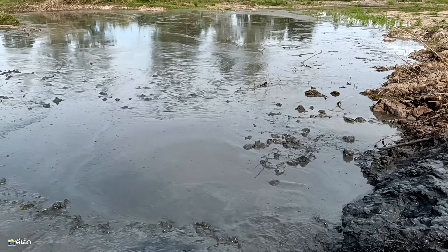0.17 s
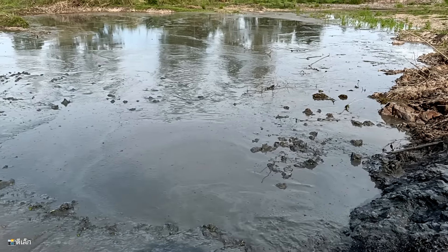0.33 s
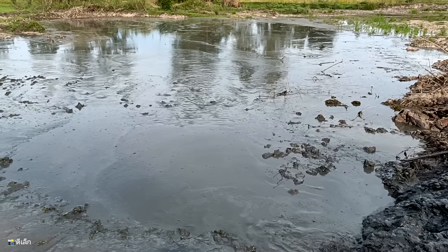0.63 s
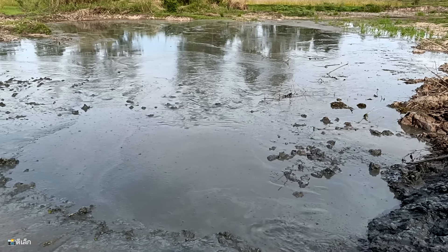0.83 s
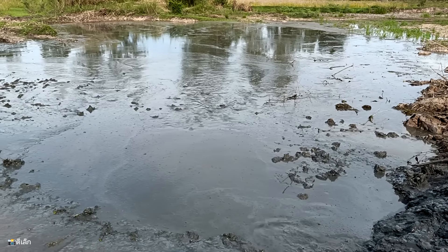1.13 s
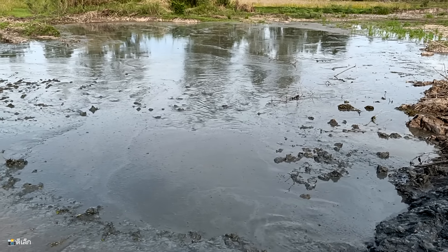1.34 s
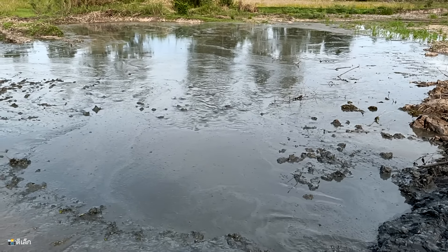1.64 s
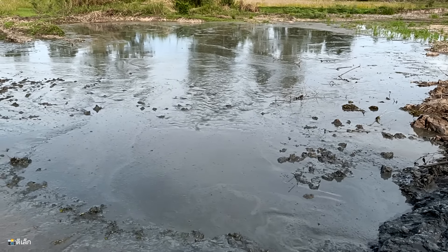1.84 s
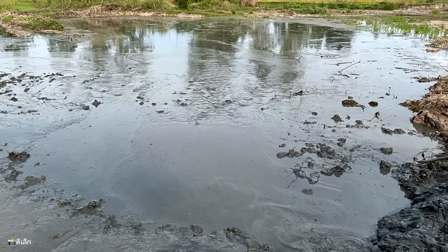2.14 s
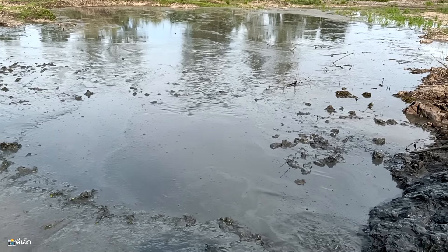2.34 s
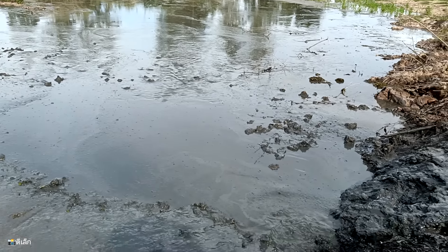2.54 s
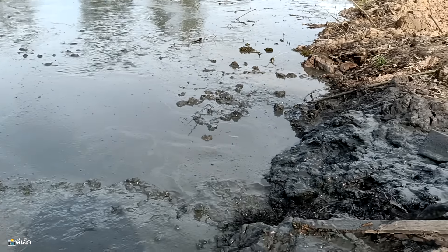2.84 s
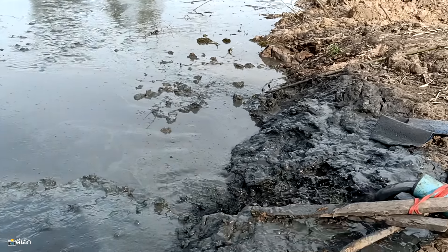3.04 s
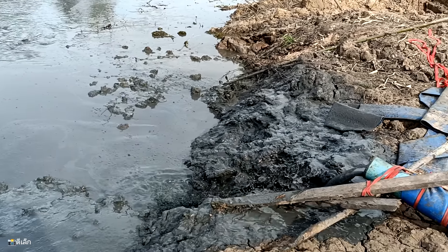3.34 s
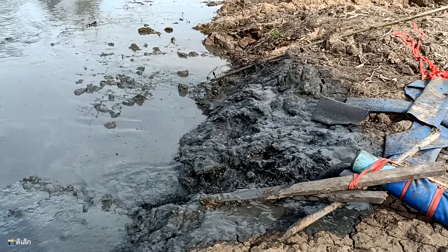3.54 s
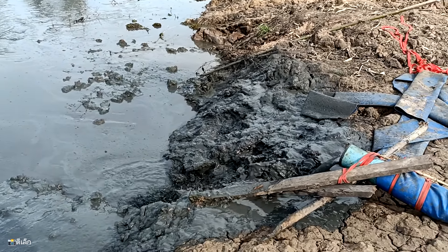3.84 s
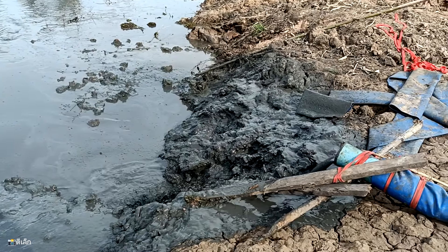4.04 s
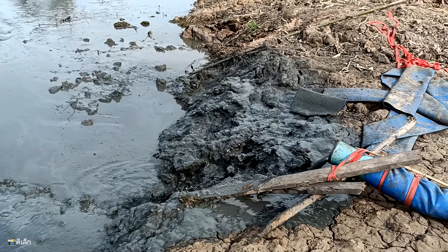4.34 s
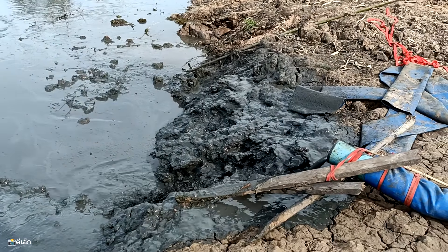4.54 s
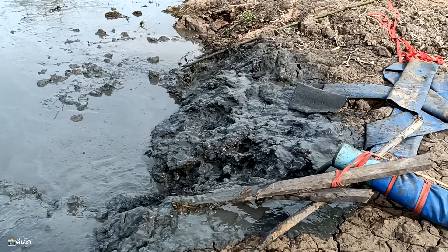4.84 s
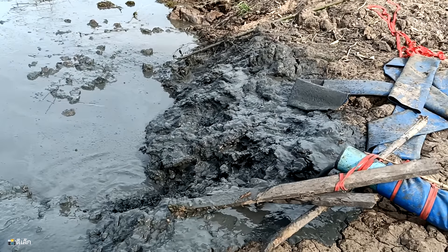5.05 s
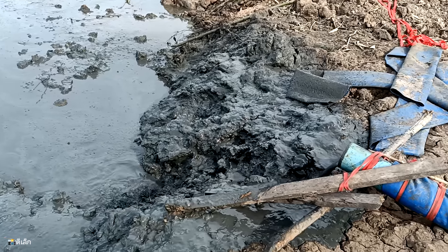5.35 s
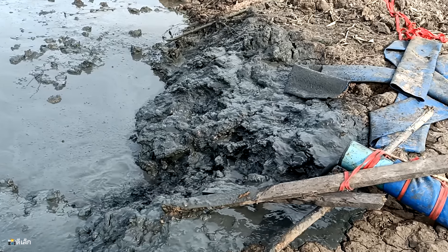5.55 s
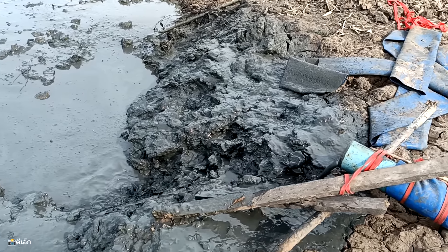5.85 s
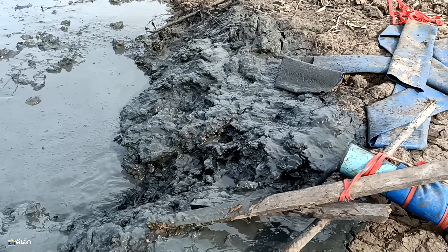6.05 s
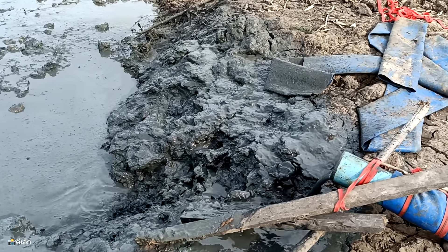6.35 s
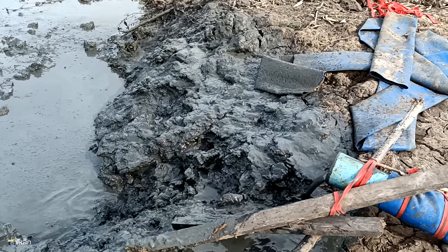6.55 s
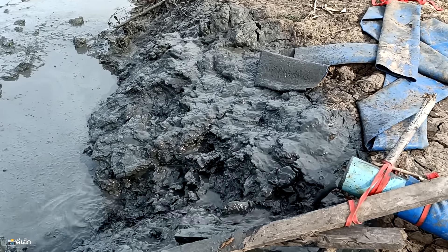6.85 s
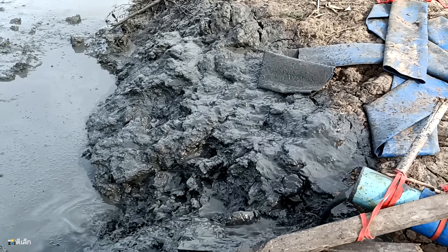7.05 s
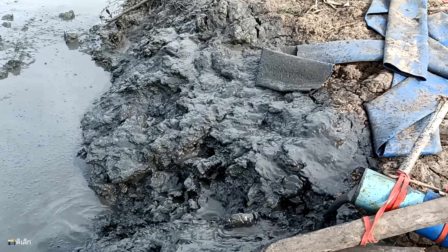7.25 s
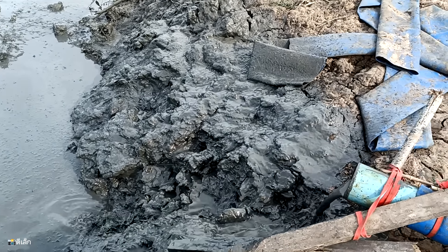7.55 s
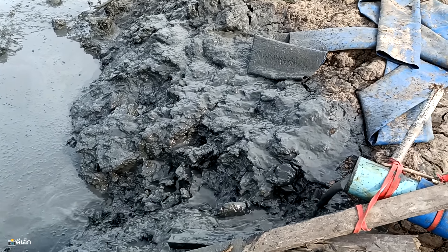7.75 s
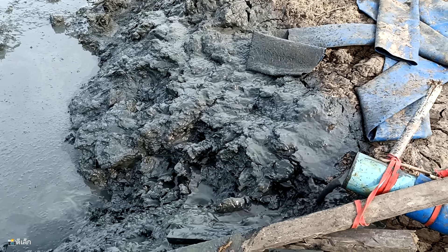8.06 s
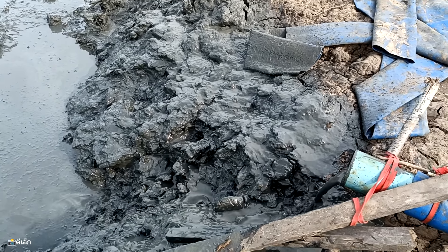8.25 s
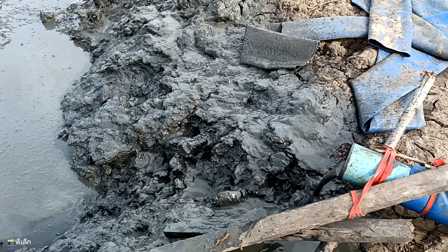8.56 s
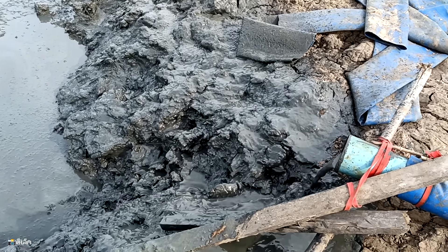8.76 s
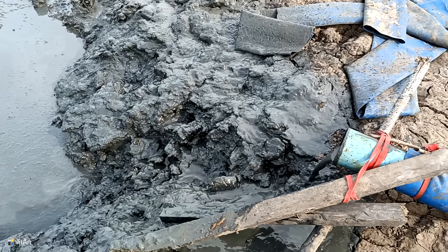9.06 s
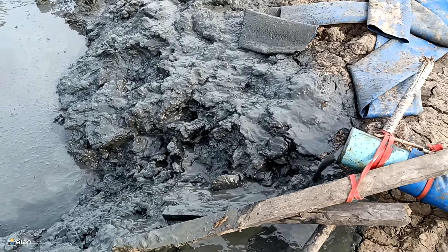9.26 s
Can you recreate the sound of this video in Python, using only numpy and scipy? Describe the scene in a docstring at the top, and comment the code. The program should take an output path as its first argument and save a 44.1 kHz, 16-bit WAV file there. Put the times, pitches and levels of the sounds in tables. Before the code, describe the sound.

From 0 s, a diesel engine driving a pump chugs evenly, about nine throbs a second, with low exhaust boom and a faint hum that sinks in pitch around 1 s. Mud slurry gushes strongly over it: low gurgle, mid splashing and wide bright hiss, with deep glugs at 0.1, 0.6 and 1.1 s. Between 1.8 and 3.1 s the microphone turns to the bank; the gurgle falls away, the spray thins and the engine's metallic clatter comes forward. Wet mud splats snap at about 3.2, 3.5, 4.6, 6.4 and 7 s over small pattering gobs. Loose steel chinks occasionally, more busily from 7.6 to 8.6 s. Little bubbles chirp near 5 and 8 s, and fine droplets tick around 8 s. The gush keeps receding while the engine holds steady to about 9.4 s, the tone drifting slightly, outdoors in stereo.

```python
"""Beside a pond, a diesel drives a dredge pump at a steady speed, throbbing once per engine cycle.
Harmonic lines and pipe noise form its exhaust, pulsed resonances its clatter and one sine the pump's hum.
Mud slurry gushes from a hose: damped bubble tones and hiss gurgle, splash and spray, with wet splats.
The microphone turns away from the gush after a few seconds, and the engine's clatter comes forward."""
import sys
import numpy as np
from scipy import signal
from scipy.fft import rfft, irfft, next_fast_len
from scipy.io import wavfile
from scipy.ndimage import uniform_filter1d, map_coordinates

SR = 44100
rng = np.random.default_rng(int(sys.argv[2]) if len(sys.argv) > 2 else 0)


def store_pcm(level_fs):
    """Save levels as 16-bit WAV."""
    pcm = np.round(np.clip(level_fs, -1, 1) * 32767).astype(np.int16)
    wavfile.write(sys.argv[1], SR, np.atleast_2d(pcm).T)


N = 414533  # samples


def amp(db):
    """Level law: decibels to amplitude ratio."""
    return 10 ** (np.asarray(db) / 20)


def unit(x):
    """Power normalisation: scale to rms 1."""
    return x / np.sqrt(np.mean(x ** 2) + 1e-20)


def along(points, hz):
    """Logarithmic interpolation: (f/Hz, value) points read on a log frequency axis."""
    f, value = np.transpose(points)
    return np.interp(np.log(hz + 1), np.log(f + 1), value)


def curves(rows):
    """Linear interpolation: one value per sample for each column after the time."""
    s, *columns = np.transpose(rows)
    return [np.interp(np.arange(N) / SR, s, column) for column in columns]


def wobble(rate):
    """Band-limited randomness: a smooth random curve with rate knots a second."""
    knots = rng.standard_normal(int(N * rate / SR) + 4)
    return map_coordinates(knots, [np.arange(N) * rate / SR])


def delayed(x, lag):
    """Propagation delay: x shifted later by a varying number of samples."""
    return map_coordinates(x, [np.arange(N) - lag], mode="nearest")


def add_at(out, s, sound):
    """Superposition: add a short sound at time s in seconds."""
    start = round(s * SR)
    out[..., start:start + sound.shape[-1]] += sound


def filtered(x, response):
    """Linear filtering: multiply the spectrum by a response of frequency."""
    m = next_fast_len(N + SR // 2)
    return irfft(rfft(x, m) * response(np.fft.rfftfreq(m, 1 / SR)), m)[..., :N]


def coloured(x, spectrum):
    """Spectral shaping: x with a (f/Hz, level/dB) colour, at rms 1."""
    return unit(filtered(x, lambda hz: amp(along(spectrum, hz))))


def resonate(x, modes):
    """Modal resonance: x through (f/Hz, width/Hz, level/dB) modes of alternating sign, at rms 1."""
    def response(f):
        total = 0
        for k, (centre, width, db) in enumerate(modes):
            damping = 1j * f * width
            total = total + (-1) ** k * amp(db) * damping / (centre * centre - f * f + damping)
        return total
    return unit(filtered(x, response))


def spread(pair, alike):
    """Coherence: mix two unrelated signals into left and right with a given likeness, at rms 1."""
    def mid_side(hz):
        angle = np.arccos(np.clip(along(alike, hz), -1, 1)) / 2
        return np.array([np.cos(angle), np.sin(angle)])
    mid, side = filtered(pair, mid_side)
    return unit(np.array([mid + side, mid - side]))


def bubbles(rate, centre_hz, scatter, cycles, size_db, rise):
    """Bubble resonance: damped rising sines of random pitch and size, rate a second, at rms 1."""
    u = rng.random((int(rate * N / SR), 4))
    hz = np.minimum(centre_hz * np.exp(scatter * (2 * u[:, 1:2] - 1)), SR / 3)
    t = np.arange(int(cycles * SR / centre_hz * np.exp(scatter / 2)) + 2) / SR
    age = t * hz / cycles  # 1 when the ring has decayed by 60 dB
    size = amp(-size_db * np.log(np.maximum(u[:, 2:3], 1 / 100)))
    tone = np.sin(2 * np.pi * hz * t * (1 + rise * np.minimum(age, 1) / 2))
    ring = size * tone * amp(-60 * age) * (1 - np.exp(-2 * hz * t))
    at = (u[:, :1] * N).astype(int) + np.arange(len(t))
    return unit(np.bincount(at.ravel(), ring.ravel(), N)[:N])


def bubble_pair(**settings):
    """Statistical independence: two unrelated bubble streams."""
    return np.array([bubbles(**settings) for _ in range(2)])


def strikes(count_of_blows, scatter_db):
    """Impulsive excitation: an uneven blow each time a rising count passes a whole number."""
    hit = np.diff(np.floor(count_of_blows), prepend=0) > 0
    return hit * amp(scatter_db * rng.standard_normal(N))


# microphone heading: t/s, heading (0 facing the pond .. 1 facing the bank)
MICROPHONE_HEADING = [(0, 0.18), (1.8, 0.21), (3.1, 0.74)]


def facing_bank():
    """Rotation: the microphone's heading at each sample."""
    heading, = curves(MICROPHONE_HEADING)
    return heading


CREEP_START_S = 3.94


def crept():
    """Translation: seconds for which the microphone has been creeping along the bank."""
    return np.maximum(np.arange(N) / SR - CREEP_START_S, 0)


# echo strength: t/s, amplitude share of the direct sound
ECHO_STRENGTH = [(0, 0.03), (6.2, 0.11), (6.8, 0.22), (7.6, 0.18), (8.2, 0.074)]
ECHO_MS, ECHO_MS_PER_S = 1.98, 0.127  # first delay, and its growth per second of creeping


def off_the_bank(x):
    """Comb filtering: an echo off the mud bank comes later as the microphone creeps along."""
    delay_ms = ECHO_MS + ECHO_MS_PER_S * crept()
    strength, = curves(ECHO_STRENGTH)
    n = np.arange(N)
    echo = np.array([np.interp(n - delay_ms * SR / 1000, n, side) for side in x])
    return (x + strength * echo) / np.sqrt(1 + strength ** 2)


# exhaust lines at 3, 4, 5 .. times the engine cycle:
# relative level/dB facing the pond, relative level/dB facing the bank
EXHAUST_LINES = [(-51, -52), (-58, -47), (-48, -45), (-25.5, -34.5), (-42, -40), (-50, -41), (-30, -30.5),
                 (-39, -35), (-30, -37), (-18.5, -26.5), (-23, -28), (-25.5, -34), (-22, -34), (-39, -38),
                 (-42, -42), (-34.5, -32), (-38, -35), (-50, -45.5), (-34, -35), (-37, -42.5)]
# exhaust pipe resonances: f/Hz, width/Hz, relative level/dB
PIPE_MODES = [(87, 27, -9.5), (114.1, 15.8, 0.5), (151, 41, -9), (195, 31, -14), (224, 30, -16.5),
              (321, 100, -25)]
# the throb swells and sags at the moving microphone: t/s, level/dB
THROB_LEVEL = [(0, -17.5), (0.35, -16.5), (1.25, -20.5), (2.65, -20.5), (2.95, -24), (3.35, -22),
               (3.6, -25), (4.15, -22), (4.55, -24), (5.6, -22.5), (5.95, -23), (6.35, -22.5), (7.0, -22),
               (8.15, -24), (8.5, -21), (9.0, -23), (9.25, -20.5)]
PUFF_AT, BOOM_AT = 0.385, 0.24  # crests of the puff and the boom, share of the engine cycle


def exhaust(cycle, heading, rough_db, uneven_db):
    """Fourier series: unequal cylinders give lines at cycle multiples; gas noise rumbles in the pipe."""
    lines = np.zeros(N)
    stroke_db = uneven_db * wobble(19)  # uneven burning
    for order, (pond_db, bank_db) in enumerate(EXHAUST_LINES, 3):
        crest = BOOM_AT if 9 < order < 15 else PUFF_AT
        phase = 2 * np.pi * order * (cycle - crest)
        # the highest lines take random phases, so they crest at no common moment
        phase += (order > 18) * rng.uniform(0, 2 * np.pi)
        # only lines above order 7 follow the uneven burning
        waver_db = (order > 7) * (.4 + .6 * heading) * stroke_db + .9 * wobble(4)
        line_db = pond_db + (bank_db - pond_db) * heading + waver_db
        lines += amp(line_db) * np.cos(phase)
    # hold the half-second rms at 1
    steady = lines / np.sqrt(uniform_filter1d(lines ** 2, SR // 2, mode="reflect"))
    gas = rng.standard_normal((2, N))
    pipe = spread(resonate(gas, PIPE_MODES), [(100, 0.97), (300, 0.75)])
    rumble = coloured(pipe, [(20, -2), (70, -1.5), (130, -0.5), (220, 2), (380, -6.5), (600, -34), (1500, -60)])
    throb_db, = curves(THROB_LEVEL)
    return amp(throb_db) * (steady + amp(rough_db + 5.8 * heading) * rumble)


# engine block and pump casing: f/Hz, relative spectral level/dB per Hz
BLOCK_COLOUR = [(160, -32), (280, 8.5), (373, 4.5), (450, -3.5), (489, 0.5), (1010, 4), (1330, 7),
                (1470, 5), (1630, 7.5), (1890, -7), (3600, -1.5), (3920, -27), (5880, -4.5), (7580, -48),
                (16000, -44.5)]
# ringing engine parts: f/Hz, width/Hz, relative level/dB
CASING_MODES = [(992, 110, 4.5), (1824, 68, 0), (2143, 280, 3.5), (2550, 82, 4.5), (2840, 340, -1.5),
                (3550, 170, 3), (4725, 130, -1), (6310, 350, -4.5)]
# left-right likeness of the engine: f/Hz, coherence
ENGINE_LIKENESS = [(130, 0.9), (300, 0.047), (700, 0.88), (1500, 0.91), (3000, 0.082), (7000, .1)]


def clatter(cycle, block_db, casing_db):
    """Amplitude modulation: injectors and valves rattle the block in step with the shaft."""
    def beat(order, lag):
        return np.cos(2 * np.pi * order * (cycle - lag))
    pulse = amp(1.4 * beat(order=1, lag=.67) + 1.3 * beat(order=2, lag=.66) + 1.3 * beat(order=6, lag=.66))

    def rattle():
        return pulse * spread(rng.standard_normal((2, N)), ENGINE_LIKENESS)
    block = amp(block_db) * coloured(rattle(), BLOCK_COLOUR)
    casing = amp(casing_db) * resonate(rattle(), CASING_MODES)
    return block + casing


# hard scrapes of a loose steel part on the engine: t/s, relative peak level/dB
STEEL_SCRAPES = [(2.4984, -22), (2.8355, -15.5), (2.9414, -20.5), (3.456, -22), (3.7943, -23),
                 (4.6299, -23), (5.3, -28), (5.4081, -21.5), (5.6895, -25), (5.9145, -24), (7.615, -33),
                 (7.634, -29), (7.668, -31), (7.6954, -20), (7.8005, -22.5), (7.825, -37), (7.905, -32),
                 (8.1, -39), (8.245, -31), (8.268, -33), (8.304, -22.5), (8.3509, -25), (8.405, -31),
                 (8.4564, -26), (8.5041, -25), (8.5989, -27), (8.91, -32)]
# modes of the loose steel part: f/Hz, width/Hz, relative level/dB
STEEL_MODES = [(3540, 45, 2), (3690, 100, -4), (6030, 170, -8)]


def chinks(cycle, scrape_t60, gain_db, chatter_db, spells_db):
    """Modal excitation: a loose steel part chatters about once a turn and now and then scrapes its seat."""
    out, t = np.zeros(N + SR), np.arange(SR // 10) / SR
    modes = sum(amp(db) * np.sin(2 * np.pi * hz * t) * np.exp(-np.pi * width * t)
                for hz, width, db in STEEL_MODES)
    for s, db in STEEL_SCRAPES:
        scrape = rng.standard_normal(len(t)) * amp(-60 * t / scrape_t60)
        ring = signal.fftconvolve(scrape, modes)[:len(t)]
        add_at(out, s, amp(db + gain_db) * ring / np.abs(ring).max())
    taps = strikes(2 * cycle + .15 * wobble(25), scatter_db=4)
    chatter = unit(amp(spells_db * wobble(2.28)) * signal.oaconvolve(taps, modes)[:N])
    return out[:N] + amp(chatter_db) * chatter


# crankshaft speed: t/s, turns per second
SHAFT_SPEED = [(0, 18.609), (0.4, 18.567), (2.2, 18.879), (5.9, 18.811), (7.8, 18.835), (9.4, 18.788)]


def engine():
    """Arrival-time difference: the engine stands off to the right and reaches the left port late."""
    turns, = curves(SHAFT_SPEED)
    heading = facing_bank()
    cycle = np.cumsum(turns) / SR / 2  # four-stroke: two turns a cycle
    rattling = off_the_bank(clatter(cycle, block_db=-37.0, casing_db=-37.5))
    steel = chinks(cycle, scrape_t60=0.0125, gain_db=2.5, chatter_db=-58, spells_db=-1)
    metal = rattling + steel
    left, right = exhaust(cycle, heading, rough_db=-9.2, uneven_db=0.9) + metal
    return np.array([delayed(left, 14 * heading), right])  # lag in samples


# the pump's hum sinks under load: t/s, f/Hz, peak level/dB
PUMP_HUM = [(0, 153, -26), (0.68, 153, -25), (0.88, 146, -30), (1.1, 132.3, -34), (4.5, 132.5, -35),
            (6.3, 132.5, -31), (9.4, 132.4, -33)]


def pump():
    """Beating: one humming sine beats slowly against the exhaust."""
    hz, db = curves(PUMP_HUM)
    return amp(db) * np.sin(2 * np.pi * np.cumsum(hz) / SR)


def gush_db(level):
    """Directivity and distance: a steady flow fades as the microphone turns, then creeps away."""
    pond_db, turn_db, db_per_s = level
    return pond_db - turn_db * facing_bank() - db_per_s * crept()


def patchy(x, depth_db):
    """Time-frequency modulation: slurry over the bank varies in patches; the open jet is even."""
    heading = facing_bank()
    z = signal.stft(x, nperseg=512)[2]
    field = rng.standard_normal(z.shape[1:])
    field = uniform_filter1d(uniform_filter1d(field, size=5, axis=0), size=7, axis=1)
    uneven = signal.istft(z * amp(depth_db * unit(field)), nperseg=512)[1][:, :N]
    return unit(heading * uneven + (1 - heading) * x)


# colours of the slurry's three voices: f/Hz, relative spectral level/dB per Hz
GURGLE_COLOUR = [(120, -46), (200, -6), (250, -5.5), (380, -4), (500, -13), (800, -30.5)]
SPLASH_COLOUR = [(300, -66), (420, -40), (540, -10), (720, -2), (1000, -1), (1300, 1), (1520, -17.5),
                 (2200, -28.5)]
SPRAY_COLOUR = [(900, -31), (1450, -11.5), (1700, -5), (2200, -4), (2750, 2.5), (3300, 0), (3900, 4),
                (4500, 2.5), (6850, 2.5), (7400, -4), (9000, -8), (11000, -15), (13500, -15), (16000, -38)]
# their levels: base level/dB facing the pond, loss/dB by turning to the bank, loss/dB per s of creeping
GURGLE_FADE = (-25, 20.1, 2.74)
SPLASH_FADE = (-29, 8.7, 5.4)
SPRAY_FADE = (-26.5, 11.33, 2.17)
# left-right likeness of the gush: f/Hz, coherence
GUSH_LIKENESS = [(130, 1), (300, 1), (640, 1), (1400, 0.21), (3000, 0.034), (7000, 0.043)]
# the gush leads at the left port facing the pond, and at the right port facing the hose on the bank
POND_LEAD_MS, BANK_LEAD_MS = 0.23, -0.29


def slurry():
    """Bubble resonance: large ones gurgle, smaller ones splash, fine drops crackle over the jet's hiss."""
    gurgle_db, splash_db, spray_db = gush_db(GURGLE_FADE), gush_db(SPLASH_FADE), gush_db(SPRAY_FADE)

    def hiss():
        return rng.standard_normal((2, N))
    big = bubble_pair(rate=200, centre_hz=309.3, scatter=0.456, cycles=15.0, size_db=2.0, rise=0.23)
    small = bubble_pair(rate=480, centre_hz=899.0, scatter=0.586, cycles=30, size_db=1.0, rise=0.12)
    drops = bubble_pair(rate=2000, centre_hz=3823, scatter=0.96, cycles=71.0, size_db=0.0, rise=0.14)

    gurgle = amp(gurgle_db) * coloured(spread(big + 8 * hiss(), GUSH_LIKENESS), GURGLE_COLOUR)
    splash_gain = amp(splash_db + 1.53 + 0.5 * wobble(14))
    wash = spread(small + 2.5 * hiss(), GUSH_LIKENESS)
    splash = splash_gain * off_the_bank(coloured(wash, SPLASH_COLOUR))
    fizz = spread(patchy(drops + 1.0 * hiss(), depth_db=3.2), GUSH_LIKENESS)
    spray_gain = amp(spray_db + 2.5 + 0.91 * wobble(16))
    spray = spray_gain * off_the_bank(coloured(fizz, SPRAY_COLOUR))

    left, right = gurgle + splash + spray
    heading = facing_bank()
    lead_ms = POND_LEAD_MS * (1 - heading) + BANK_LEAD_MS * heading
    return np.array([left, delayed(right, lead_ms * SR / 1000)])


# air pockets bursting in the mud: t/s, relative peak level/dB, starting f/Hz
AIR_POCKETS = [(0.135, -14, 395), (0.572, -11, 264), (0.651, -12, 275), (0.697, -17, 282), (1.147, -8, 258),
               (2.211, -19, 1200), (2.775, -18.5, 706), (2.986, -22, 726), (3.213, -25, 1010),
               (3.296, -20.5, 670), (3.598, -23, 855), (3.839, -28, 1200), (3.906, -22, 851),
               (4.347, -21, 840), (5.506, -21, 1010), (6.196, -27, 1380), (6.33, -36, 750), (7.3, -25, 990),
               (7.324, -28, 1280)]


def glugs(cycles, rise, gain_db):
    """Bubble resonance: an air pocket rings for a few cycles and rises in pitch as it surfaces."""
    out, t = np.zeros(N + SR), np.arange(SR // 8) / SR
    for s, db, hz in AIR_POCKETS:
        life = cycles / np.sqrt(hz * 300)  # small bubbles ring for more cycles than large ones
        age = t / life
        tone = np.sin(2 * np.pi * hz * t * (1 + rise * np.minimum(age, 1)))
        ring = tone * amp(-60 * age) * (1 - np.exp(-10 * age))
        add_at(out, s, amp(db + gain_db) * ring / np.abs(ring).max())
    return out[:N]


# lumps of mud landing: t/s, relative peak level/dB, centre f/Hz
MUD_LUMPS = [(3.051, -17, 3520), (3.217, -12, 5750), (3.456, -14.5, 3512), (4.416, -17.5, 6160),
             (4.592, -13, 4650), (4.6017, -12, 4270), (6.153, -18, 5110), (6.353, -17, 4670),
             (6.547, -18.5, 4700), (6.764, -21, 2920), (6.9844, -15.5, 3170), (7.079, -24, 5030),
             (8.323, -19, 5900)]
# colour of wet smacks: f/Hz, relative spectral level/dB per Hz
SMACK_COLOUR = [(1200, -24), (2400, 5.5), (3500, 1), (6500, 6), (7600, -3), (9500, -12), (13000, -7),
                (16000, -12)]
SPLAT_T60_S, SPLAT_ATTACK_S = 0.037, 0.0009


def splats(width, gain_db):
    """Cavity resonance: lumps of mud land with a short wet snap around one pitch."""
    out, t = np.zeros((2, N + SR)), np.arange(SR // 16) / SR
    f = np.fft.rfftfreq(len(t), 1 / SR)
    for s, db, hz in MUD_LUMPS:
        envelope = amp(-60 * t / SPLAT_T60_S) * (1 - np.exp(-t / SPLAT_ATTACK_S))
        burst = rng.standard_normal((2, len(t))) * envelope
        damping = 1j * f * width * hz
        cavity = damping / (hz * hz - f * f + damping)
        # the smack colour acts at half its dB
        snap = irfft(rfft(burst) * cavity * amp(along(SMACK_COLOUR, f) / 2), len(t))
        add_at(out, s, amp(db + gain_db) * snap / np.abs(snap).max(axis=1, keepdims=True))
    return out[:, :N]


# small bubbles on the mud close by: t/s, relative peak level/dB, starting f/Hz
SMALL_BUBBLES = [(3.12, -24, 6560), (3.19, -31, 6600), (3.68, -25, 6700), (4.97, -24, 6870),
                 (5.06, -29, 6960), (5.17, -26, 6800), (5.24, -24, 7200), (5.32, -28, 6800),
                 (7.0, -27, 5600), (7.52, -28, 2990), (7.753, -26, 2950), (8.012, -17, 5430),
                 (8.225, -24, 6050), (8.378, -24, 5700), (8.582, -34, 5780), (8.603, -30, 5840),
                 (8.655, -28, 5600), (8.668, -27, 5800)]


def pings(t60, rise, gain_db):
    """Bubble resonance: a small bubble rings briefly and chirps upwards as it opens."""
    out, t = np.zeros(N + SR), np.arange(SR // 20) / SR
    for s, db, hz in SMALL_BUBBLES:
        age = t / t60
        tone = np.sin(2 * np.pi * hz * t * (1 + rise * age))
        ring = tone * amp(-60 * age) * (1 - np.exp(-20 * age))
        add_at(out, s, amp(db + gain_db) * ring / np.abs(ring).max())
    return out[:N]


def patter(rate, size_db, t60, level_db):
    """Energy summation: small gobs keep smacking onto the mud bank, heard best when facing it."""
    heading = facing_bank()
    spray_db = gush_db(SPRAY_FADE)
    u = rng.random((int(rate * N / SR), 2))
    size = amp(-size_db * np.log(np.maximum(u[:, 1], 1 / 10)))
    landings = np.bincount((u[:, 0] * N).astype(int), size ** 2, N)
    t = np.arange(SR // 10) / SR
    energy = np.abs(signal.fftconvolve(landings, amp(-60 * t / t60) ** 2)[:N])
    drops = bubble_pair(rate=2500, centre_hz=6220, scatter=1.0, cycles=3.8, size_db=2.0, rise=0.19)
    smacks = coloured(np.sqrt(energy) * drops, SMACK_COLOUR)
    return heading * amp(level_db + spray_db / 2) * smacks


# tiny bright cracks, some topping the wet splats, others single ticks: t/s, relative level/dB
BRIGHT_CRACKS = [(3.2184, -31), (3.5035, -30), (4.416, -26), (4.6022, -31), (5.1245, -37), (5.2323, -37),
                 (5.6757, -37), (6.1532, -29), (6.88, -30), (7.091, -40), (7.1498, -32), (7.2946, -32),
                 (7.3562, -29), (7.5, -31), (7.6882, -30), (7.8116, -30), (7.865, -31), (8.0805, -34),
                 (8.165, -36), (8.3242, -30), (8.7957, -38), (9.2007, -43), (9.3324, -38)]


def cracks(t60, gain_db):
    """Exponential decay: tiny bright cracks of noise, some topping the wet splats, others single ticks."""
    out, t = np.zeros((2, N + SR)), np.arange(SR // 40) / SR
    for s, db in BRIGHT_CRACKS:
        add_at(out, s, amp(db + gain_db - 60 * t / t60) * rng.standard_normal((2, len(t))))
    bright = [(3000, -30), (7000, 6), (9500, -3), (14000, -5), (16000, -10)]
    return filtered(out[:, :N], lambda hz: amp(along(bright, hz)))


# one flurry of fine droplets swells and fades over a faint steady ticking
FLURRY_S, FLURRY_DB, TICKING_DB = 8, -51, -69
FLURRY_RISE_DB_PER_S, FLURRY_FALL_DB_PER_S = 4, 10.5


def droplets(clump_db):
    """Random superposition: clumped tiny drops tick on the wet mud, over an even mist."""
    late = np.arange(N) / SR - FLURRY_S
    flurry_db = FLURRY_DB + np.minimum(FLURRY_RISE_DB_PER_S * late, -FLURRY_FALL_DB_PER_S * late)
    level_db = np.maximum(TICKING_DB, flurry_db)
    ticks = bubble_pair(rate=130, centre_hz=8800, scatter=0.3, cycles=12, size_db=2.8, rise=0.1)
    mist = bubble_pair(rate=730, centre_hz=12600, scatter=0.091, cycles=12, size_db=2.0, rise=.1)
    clumped = amp(clump_db * np.minimum(wobble(14), 1)) * ticks
    colour = [(3000, -6), (6500, 1.5), (9000, -2), (13000, -4.0), (16000, 9)]
    return amp(level_db) * coloured(clumped + 0.76 * mist, colour)


def swept(x, band, width_octaves):
    """Time-varying filtering: a soft dip or peak slides along a (t/s, f/Hz, gain/dB) path."""
    hz, s, z = signal.stft(x, SR, nperseg=1024)
    when, centre_hz, gain_db = np.transpose(band)
    octaves = np.log2((hz[:, None] + 1) / np.interp(s, when, centre_hz))
    bell = amp(np.interp(s, when, gain_db) * np.exp(-(octaves / width_octaves) ** 2 / 2))
    return signal.istft(z * bell, SR, nperseg=1024)[1][:, :N]


# a hollow and a bright band drift as the microphone moves: t/s, centre f/Hz, gain/dB
HOLLOW_BAND = [(4.0, 1890, 3), (5.4, 1620, -1), (6.1, 1360, -1.5), (6.9, 1060, -5), (7.5, 1161, -6),
               (8.2, 1350, -8), (9.4, 1360, -6.5)]
BRIGHT_BAND = [(3.3, 2500, 1), (4.3, 2470, 4.5), (4.8, 2552, 1), (5.45, 2550, 8.5), (6.3, 2754, 0.5),
               (6.8, 3037, 3), (7.4, 2900, -0.5), (8.1, 2880, 5), (9.4, 2540, -5)]


def scene():
    """Superposition: engine and slurry add in the open air."""
    lumps = glugs(cycles=11.4, rise=0.042, gain_db=-4.5) + splats(width=0.25, gain_db=0.0)
    lumps = lumps + pings(t60=0.023, rise=0.057, gain_db=-7.0)
    spatter = patter(rate=43, size_db=4.0, t60=0.047, level_db=-19.5)
    spatter = spatter + droplets(clump_db=8.5) + cracks(t60=0.024, gain_db=-1.0)
    hollowed = swept(engine() + slurry(), HOLLOW_BAND, width_octaves=0.23)
    drifting = swept(hollowed, BRIGHT_BAND, width_octaves=0.055)
    return drifting + pump() + lumps + spatter


# the two microphone ports: f/Hz, left-right level/dB before the long waves are evened out
PORT_DIFFERENCE = [(200, 1), (450, -2.5), (700, -1), (1300, -4), (2400, -4), (3500, -7.5), (4600, -10),
                   (6200, -24), (7000, -6), (7800, 9), (9000, 19), (10500, 5.5), (12000, 0), (14000, -13)]
TOP_HZ = 15900  # nothing passes above this


def record(dry):
    """Diffraction: each port colours the treble in its own way, while long waves reach both alike."""
    def ports(hz):
        treble_share = hz ** 2 / (hz ** 2 + 300 ** 2)
        tilt = amp(along(PORT_DIFFERENCE, hz) * treble_share)
        equal_power = np.sqrt(2 / (1 + tilt ** 2))
        return np.array([tilt, np.ones_like(tilt)]) * equal_power * (hz < TOP_HZ)
    return filtered(dry, ports)


dry = scene()
out = record(dry)
store_pcm(out)
```